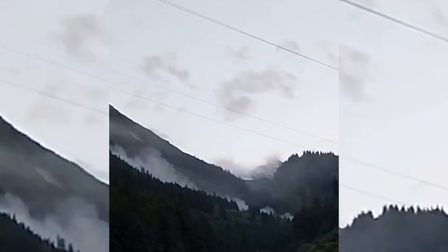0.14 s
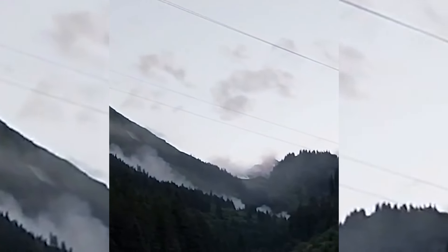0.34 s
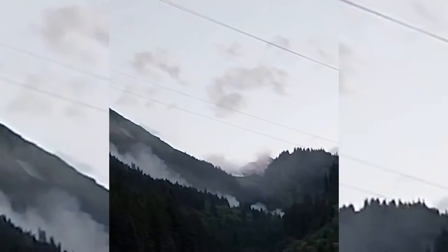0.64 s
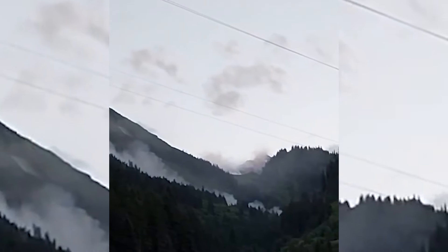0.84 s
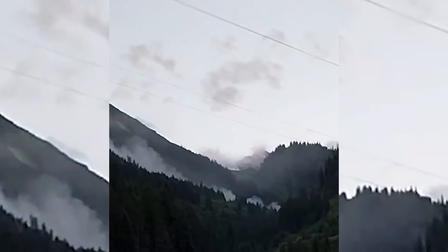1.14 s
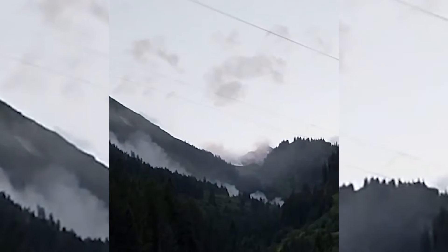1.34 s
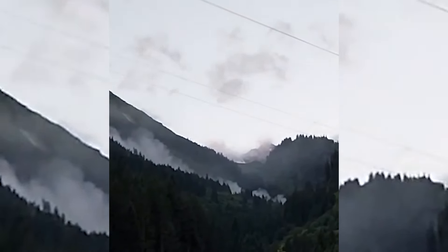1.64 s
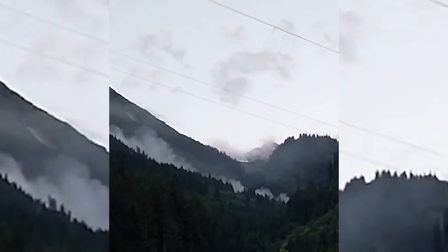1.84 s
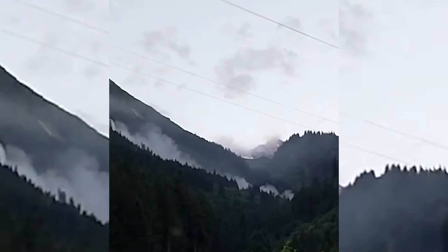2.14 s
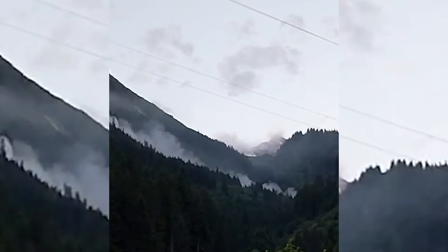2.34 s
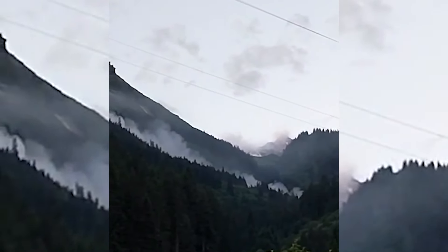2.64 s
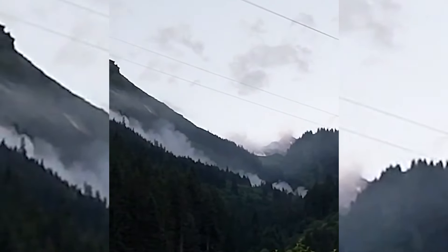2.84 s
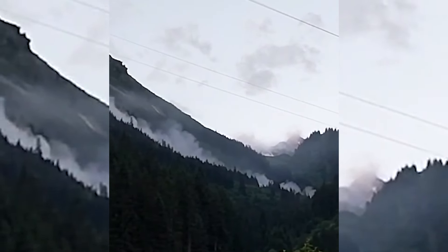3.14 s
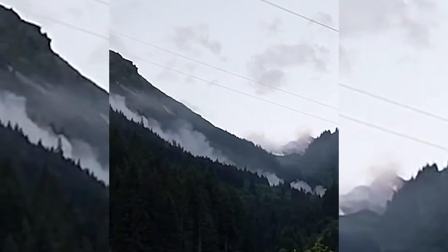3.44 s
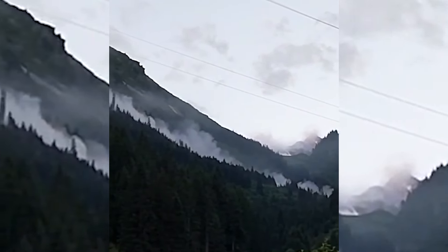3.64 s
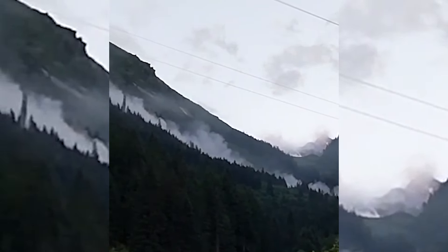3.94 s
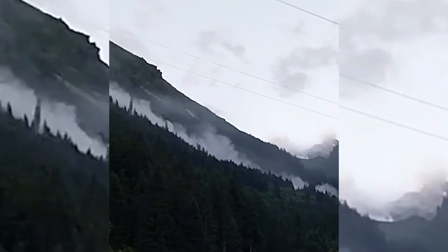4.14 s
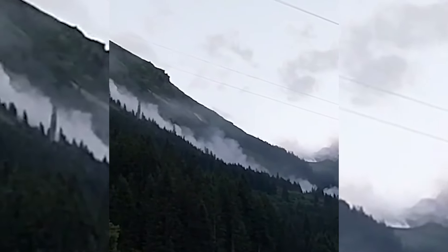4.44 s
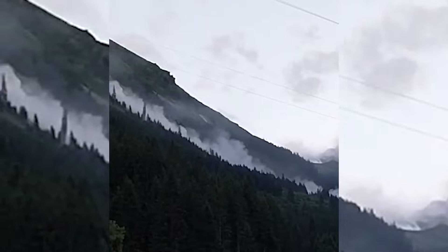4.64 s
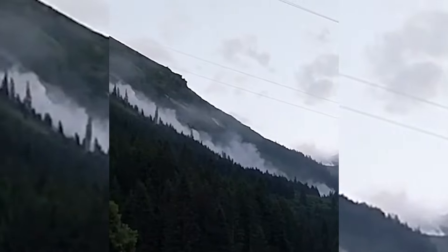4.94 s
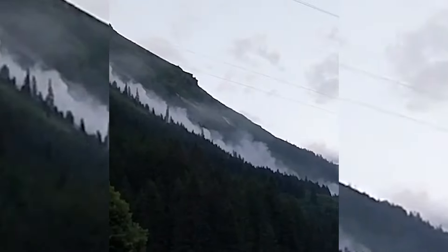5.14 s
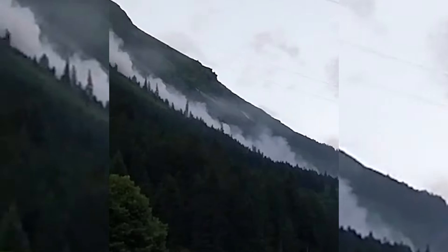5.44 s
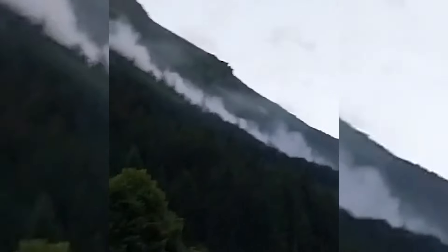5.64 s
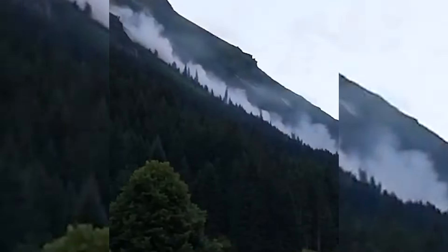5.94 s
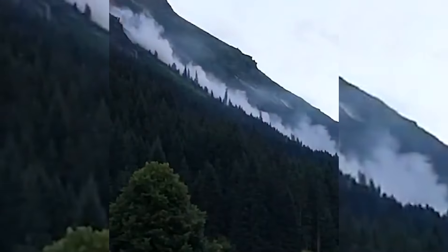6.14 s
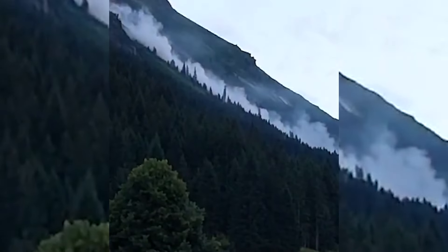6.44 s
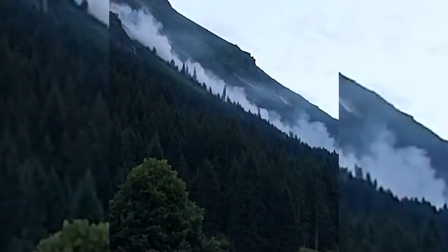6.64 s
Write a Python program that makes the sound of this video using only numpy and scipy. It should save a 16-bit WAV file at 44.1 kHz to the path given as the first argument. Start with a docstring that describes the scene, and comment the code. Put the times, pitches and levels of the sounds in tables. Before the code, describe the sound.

Rocks and debris slide down a distant mountain slope with a deep rumble and dull thuds, birds chirping faintly, hard cuts between loud and quieter stretches.

```python
"""A far mountain slope: rocks and debris slide down with a deep rumble and boulder thuds, under a thin forest hiss
and two chirping birds. Shaped noise makes the rumble, stones, gravel and hiss; short dying low tones make the thuds;
gliding tones with echoes make the birds. The sound is edited: a loud stretch and a quiet one, cut hard, play round
and round, and each cut clicks."""
import sys
import numpy as np
from scipy import signal
from scipy.fft import rfft, irfft
from scipy.io import wavfile
from scipy.ndimage import uniform_filter1d

SR = 44100
rng = np.random.default_rng(int(sys.argv[2]) if len(sys.argv) > 2 else 0)


def inscribe(sig):
    """Save sig as 16-bit PCM at rate SR to the path in sys.argv[1].

    A 1-D sig is mono; a 2-D sig holds one channel per row.
    Samples are clipped to [-1, 1] before scaling.
    """
    pcm = np.round(np.clip(np.atleast_2d(sig).T, -1, 1) * 32767)
    wavfile.write(sys.argv[1], SR, pcm.astype(np.int16))


N = 299439

LEAD_S = 0.00016  # the right port hears the slope and the high bird this much later [s]

# The loud and the quiet stretch; every event time below runs on this clock. The end values stand before the band limit:
# (start [s], end [s], first pressure (left, right) [full scale = 1], last pressure (left, right) [full scale = 1])
SPANS = [(.7266, 2.8266, (-.025, -.108), (-.1, -.113)), (2.8266, 4.3266, (-.006, -.012), (-.032, -.052))]
# Level of the stones and gravel (surge) and of the hiss, one list a stretch; the quiet stretch fades in:
# (time [s], surge [dB], hiss level [dB])
LEVELS = [
    [(.75, 1, -53), (1.15, -1.5, -52.5), (1.65, -.5, -52), (1.9, 1, -51), (2.15, 0, -52), (2.45, 2, -52),
     (2.8, .2, -51.5)],
    [(2.85, -15, -57), (3.05, -14, -57.5), (3.3, -10.5, -55), (3.65, -6.5, -52), (3.9, -6.5, -51.5),
     (4.3, -6, -52)],
]
# Tone colour of the deep roll; only its shape counts: (frequency [Hz], level per Hz [dB])
DEEP_ROLL = [(15, -55.5), (25, -38), (48, -11.5), (60, -8), (80, -15), (100, -7), (171, 1), (220, 0.5),
             (275, -11.5), (350, -19.5), (460, -28), (770, -120)]
# Unsteadiness of a chirp, a peep and a whistle, in that order: (loudness [dB], share of pitch [0-1])
UNSTEADY = (1.5, .008), (2.5, .012), (1.5, .008)


def rumble(k, t):
    """The slide rolls deeply: steadied low noise that swells and sinks."""
    # Level of the roll, one list a stretch: (time [s], level [dB])
    roll_level = [
        [(.75, -27.5), (1.17, -26.5), (1.5, -28), (1.56, -25.5), (1.63, -28), (1.77, -23), (1.83, -30),
         (1.97, -26), (2.17, -29.5), (2.62, -25), (2.8, -30)],
        [(2.85, -37.5), (3.36, -40), (3.43, -37.5), (3.74, -36.5), (3.82, -33), (3.89, -40.5), (4.0, -37.5),
         (4.25, -33.5), (4.3, -38)],
    ]
    colour = [(65, -60)] + [point for point in DEEP_ROLL if point[0] > 75]
    return noise(colour, t, np.transpose(roll_level[k]), patchy_db=1.3, size=2048, steady=0.71)


def shudder(k, t):
    """The lowest shudder: the bottom end of the roll as noise with a level curve of its own."""
    # Level of the shudder, one list a stretch: (time [s], level [dB])
    shudder_level = [
        [(.75, -40), (1.06, -49), (1.22, -37), (1.4, -46), (1.62, -38.5), (1.88, -40), (2.25, -43), (2.47, -35),
         (2.8, -45)],
        [(2.85, -52), (3.1, -48), (3.3, -46.5), (3.6, -41.5), (3.82, -52), (4.0, -41.5), (4.3, -43)],
    ]
    colour = [point for point in DEEP_ROLL if point[0] < 95] + [(110, -50), (200, -130)]
    return noise(colour, t, np.transpose(shudder_level[k]), patchy_db=.6, size=4096)


def thuds(t):
    """Each boulder gives a few low cycles that swell for some milliseconds and die."""
    # Boulders: (time [s], level before the swell [dB], pitch [Hz], time to die by 60 dB [s])
    boulders = [(0.836, -19.5, 173, 0.31), (0.94, -15, 186, 0.078), (1.099, -20, 185.4, 0.43),
                (1.396, -16, 164, 0.12), (1.869, -11, 154, 0.057), (1.971, -11, 168, 0.061),
                (2.079, -21.5, 164, 0.13), (2.232, -14.5, 192, 0.059), (2.41, -15, 146, 0.084),
                (2.592, -17, 178, 0.11), (2.685, -34, 164, 0.09), (2.757, -18.5, 225, 0.21),
                (3.26, -39, 169, 0.16), (3.377, -28, 199, 0.14), (3.433, -35.5, 171, 0.14),
                (3.559, -13.5, 199, 0.032), (3.806, -24, 226, 0.081), (3.919, -30.5, 259, 0.11),
                (3.966, -31, 248, 0.21)]
    out = np.zeros(len(t))
    u = np.arange(SR // 4) / SR
    for s, db, hz, t60 in boulders:
        if t[0] <= s < t[-1]:
            swell = 1 - np.exp(-u / 0.0016)
            ring = np.sin(2 * np.pi * hz * u) * amp(db - 60 * u / t60) * swell
            add(out, s - t[0], ring)
    return out


def clatter(k, t):
    """Smaller stones knock: mid-pitched noise that follows nearly all of the surge curve."""
    # Tone colour of the stones; only its shape counts: (frequency [Hz], level per Hz [dB])
    stones = [(180, -16), (300, -3.5), (387, -3.5), (448, -10.5), (498, -4), (545, -7.5), (640, -5.5),
              (780, -11), (950, -18.5), (1240, -53), (2090, -120)]
    s, surge_db, _ = np.transpose(LEVELS[k])
    level_db = -34.5 + 0.93 * surge_db
    return noise(stones, t, (s, level_db), patchy_db=1.1, size=1024, steady=.1)


def gravel(k, t):
    """Fine debris: higher noise that follows less than half of the surge curve."""
    # Tone colour of the fine debris; only its shape counts: (frequency [Hz], level per Hz [dB])
    fine_debris = [(530, -34.5), (900, -8), (984, -3), (1270, -5), (1680, -9), (2290, -17.5), (2600, -23),
                   (3380, -30.5), (5720, -120)]
    s, surge_db, _ = np.transpose(LEVELS[k])
    level_db = -44 + 0.44 * surge_db
    return noise(fine_debris, t, (s, level_db), patchy_db=1.37, size=1024)


def chirps():
    """The high bird's sharp chirps sweep up, hold and droop; each is a list of (s, Hz, dB)."""
    # Chirps: (start [s], sweep time [s], start pitch [Hz], top pitch [Hz], peak level [dB], echo strength [dB])
    sharp_notes = [(.784, .038, 4700, 5450, -35.5, -4), (2.392, .037, 4680, 5370, -41, 1),
                   (4.19, .023, 4950, 5510, -37.5, -3)]
    hold_s, droop_s, fade_s = .006, .012, .007
    droop_hz, droop_db = -340, -11.5
    faint_db, near_db, near = -24, -4, .72  # near: share of the sweep where the note is almost at full level
    calls = []
    for s, sweep_s, low_hz, top_hz, db, echo_db in sharp_notes:
        top = s + sweep_s
        held = top + hold_s
        drooped = held + droop_s
        rows = [(s, low_hz, db + faint_db),
                (s + near * sweep_s, low_hz + near * (top_hz - low_hz), db + near_db),
                (top, top_hz, db),
                (held, top_hz, db + near_db),
                (drooped, top_hz + droop_hz, db + droop_db),
                (drooped + fade_s, top_hz + droop_hz, db + faint_db)]
        calls.append((rows, UNSTEADY[0], echo_db))
    return calls


def peeps():
    """The high bird's soft peeps scoop up into the note and sag at the end."""
    # Peeps: (start [s], length [s], pitch [Hz], peak level [dB], place of the peak [share of length])
    soft_notes = [(2.885, .11, 5050, -56, .7), (3.348, .115, 5060, -51.5, .62),
                  (3.915, .145, 5090, -50.5, .55)]
    scoop_s, scoop_hz, sag_hz = .034, -400, -80
    early_db, end_db, echo_db = -5.5, -9, -4
    calls = []
    for s, length, hz, db, peak in soft_notes:
        rows = [(s, hz + scoop_hz, db + end_db),
                (s + scoop_s / 2, hz + scoop_hz / 4, db + early_db),
                (s + scoop_s, hz, db + early_db),
                (s + peak * length, hz, db),
                (s + length, hz + sag_hz, db + end_db)]
        calls.append((rows, UNSTEADY[1], echo_db))
    return calls


def whistles():
    """The low bird's flat note lifts a little; a break and a higher second note follow."""
    # Whistles: (start [s], first note [s], break [s], second note [s], second pitch [Hz],
    # first note's level [dB], second note's level [dB])
    two_notes = [(1.042, .075, .022, .052, 3680, -54.5, -53), (1.878, .068, .006, .088, 3600, -56, -55.5),
                 (2.778, .075, .02, .05, 3680, -54.5, -54.5), (3.552, .095, .006, .065, 3650, -56, -56)]
    flat_hz, lift_hz, slide_hz = 3465, 60, -40
    ends_db, break_db, echo_db = -3, -16, -5
    calls = []
    for s, first, pause, second, hz, db, next_db in two_notes:
        later = s + first + pause
        rows = [(s, flat_hz, db + ends_db),
                (s + .65 * first, flat_hz, db),
                (s + first, flat_hz + lift_hz, db + ends_db),
                (later - pause / 2, hz + 2 * slide_hz, db + break_db),
                (later, hz + slide_hz, next_db + ends_db),
                (later + .25 * second, hz, next_db),
                (later + second, hz + slide_hz, next_db + ends_db)]
        calls.append((rows, UNSTEADY[2], echo_db))
    return calls


def bird_note(rows, waver, flutter_db):
    """A near sine follows the rows (s, Hz, dB) while its pitch and loudness tremble a little."""
    s, hz, db = np.transpose(rows)
    t = np.arange(s[0], s[-1], 1 / SR)
    a, b = rng.standard_normal((len(t), 2)).T
    tremble = 1 + waver * evened(uniform_filter1d(a, size=120))
    # the root brings the smoothed noise back to a typical size of 1
    flutter = uniform_filter1d(uniform_filter1d(b, size=300), size=300) * np.sqrt(450)
    tone = np.sin(2 * np.pi * np.cumsum(np.interp(t, s, hz) * tremble) / SR)
    loudness = amp(np.interp(t, s, db) + flutter_db * flutter)
    return np.sqrt(2) * tone * loudness * signal.windows.tukey(len(t), .15)


def trunks(x, t60):
    """Echoes from the trees: sparse taps of random sign, other ones for each side."""
    u = np.arange(SR // 2) / SR
    signs = rng.choice([-1., 1.], (2, len(u)))
    hits = rng.random((2, len(u))) < 2000 / SR  # about 2000 echoes a second
    taps = signs * hits * amp(-60 * u / t60)
    taps = taps * np.minimum(u / .015, 1)  # the nearest trees answer late
    taps = taps / np.linalg.norm(taps, axis=1)[:, None]
    return signal.fftconvolve(x[None], taps, axes=1)[:, :len(x)]


def birds(t):
    """Both birds reach the ports directly, by clear hillside echoes and by scattered tree echoes."""
    # Clear echoes off the hillside: (delay [s], level [dB])
    hillside = [(.014, -10), (.03, -10), (.047, -12), (.064, -17)]
    # (calls, left minus right [dB], tree echo level [dB], delay of the right port [s])
    singers = ((chirps() + peeps(), -6, -6, LEAD_S), (whistles(), 3, -3, 0))
    out = 0
    for calls, pan_db, trees_db, lag_s in singers:
        song, thrown = np.zeros((2, len(t)))  # thrown: the part that goes out to be echoed
        for rows, (flutter_db, waver), echo_db in calls:
            start = rows[0][0]
            if t[0] <= start < t[-1]:
                call = bird_note(rows, waver, flutter_db)
                add(song, start - t[0], call)
                add(thrown, start - t[0], call * amp(echo_db))
        direct = np.array([song, np.roll(song, round(lag_s * SR))])
        tree_echoes = trunks(thrown, t60=.22)
        hill_echoes = sum(amp(db) * np.roll(thrown, round(s * SR)) for s, db in hillside)
        heard = direct + hill_echoes + amp(trees_db) * tree_echoes
        out = out + heard * amp([[pan_db / 2], [-pan_db / 2]])
    return out


def forest_hiss(k, t):
    """The forest hisses thinly: high noise with a slow level curve."""
    # Tone colour of the forest; only its shape counts: (frequency [Hz], level per Hz [dB])
    forest = [(2000, -40), (2500, -10), (3060, -8), (3400, -5), (3630, 0), (4300, -2), (4910, -5),
              (5650, -7.5), (6730, -11), (7400, -16), (7900, -29), (8600, -42), (12000, -58), (14000, -70)]
    s, _, hiss_db = np.transpose(LEVELS[k])
    return noise(forest, t, (s, hiss_db), patchy_db=1.54, size=512)


def top_fizz(k, t):
    """A faint fizz flickers at the very top: noise in short frames with strong patches."""
    # Tone colour of the fizz; only its shape counts: (frequency [Hz], level per Hz [dB])
    fizz = [(8200, -40), (9200, -9), (10000, -4), (10900, 0), (11500, -2), (11900, -25), (13000, -45)]
    # Level of the fizz, one list a stretch: (time [s], level [dB])
    fizz_level = [
        [(.75, -73.5), (.85, -77.5), (1.44, -77), (1.5, -70), (1.7, -73.5), (2.0, -67.5), (2.22, -72.5),
         (2.38, -77), (2.42, -66.5), (2.48, -79.5), (2.6, -71.5), (2.8, -78)],
        [(2.85, -83), (3.25, -83), (3.55, -77.5), (4.3, -78)],
    ]
    return noise(fizz, t, np.transpose(fizz_level[k]), patchy_db=2.5, size=256)


def noise(spectrum, t, rows, patchy_db, size, steady=0.):
    """Random short-time spectra with drifting patches, played along a level curve; steady irons out chance swells."""
    frames, hz = len(t) // (size // 4) + 5, np.fft.rfftfreq(size, 1 / SR)
    a, b, c, d, patches = rng.standard_normal((frames, len(hz), 5)).T
    patches = evened(uniform_filter1d(uniform_filter1d(patches, size=8, axis=0), size=8, axis=1))
    colour = amp(read(spectrum, hz)[:, None] + patchy_db * patches)
    z = np.array([a + 1j * b, c + 1j * d]) * colour  # two unrelated noises of one colour
    pair = signal.istft(z, nperseg=size, noverlap=3 * size // 4)[1][:, :len(t)]
    swell = uniform_filter1d(uniform_filter1d(pair ** 2, size=size // 2), size=size // 2)
    pair = pair / (abs(swell) + 1e-20) ** (np.clip(steady, 0, 1) / 2)
    return evened(pair) * amp(np.interp(t, *rows))


def ports(a, b):
    """Two microphone ports: the right hears a later, partly mixed with the unrelated b, and tilted."""
    # How alike the two sides are: (frequency [Hz], likeness [0-1])
    likeness = [(30, .98), (125, .993), (250, .965), (460, .84), (900, .55), (1800, .3), (3500, .22),
                (7000, .22)]
    # Balance of the sides: (frequency [Hz], left minus right [dB])
    balance = [(60, -2), (100, 0), (170, -0.5), (290, -1.5), (500, -1), (840, -7), (1430, -5.5),
               (2420, -0.5), (4100, -5.5), (6960, -2), (10000, -4.5)]
    hz = np.fft.rfftfreq(len(a), 1 / SR)
    same = np.clip(read(likeness, hz), 0, 1)
    tilt = amp(read(balance, hz) / 2)  # half goes to each side
    delayed = rfft(a) * np.exp(-2j * np.pi * hz * LEAD_S)
    right = same * delayed + np.sqrt(1 - same ** 2) * rfft(b)
    return irfft(np.array([rfft(a) * tilt, right / tilt]), len(a))


def amp(db):
    """Turn decibels into a plain factor."""
    return 10 ** (np.asarray(db) / 20)


def evened(x):
    """Scale a signal to an average (RMS) size of 1."""
    return x / np.sqrt(np.mean(x ** 2) + 1e-20)


def read(points, hz):
    """Read a curve between its points, on a logarithmic frequency axis."""
    f, value = np.transpose(points)
    return np.interp(np.log(hz + 1), np.log(f + 1), value)


def add(mix, s, sound):
    """Mix a sound in at s seconds, cut off at the end of the mix."""
    part = mix[round(s * SR):][:len(sound)]
    part += sound[:len(part)]


def stretch(k):
    """One uncut stretch of the slope; its two ends stand at the pressures where the cuts fell."""
    start, end, first, last = SPANS[k]
    t = start + np.arange(round((end - start) * SR)) / SR
    slope = shudder(k, t) + rumble(k, t) + clatter(k, t) + gravel(k, t)
    slope += forest_hiss(k, t) + top_fizz(k, t)
    slope += thuds(t)
    out = ports(*slope) + birds(t)
    # a quickly dying 170 Hz swing bends each end to its pressure
    settle = np.exp(-(t - start) / .004) * np.cos(2 * np.pi * 170 * (t - start))
    head = np.outer(first - out[:, 0], settle)
    tail = np.outer(last - out[:, -1], settle[::-1])
    return out + head + tail


def scene():
    """The stretches, butted together; the first is already under way."""
    # Which stretch follows which: (stretch number, 0 = loud, 1 = quiet)
    play_order = [0, 0, 1, 0, 0]
    parts = [stretch(0), stretch(1)]
    tape = np.hstack([parts[k] for k in play_order])
    # only the last bit of the first stretch is heard, as long as its start time on the clock
    skip = parts[0].shape[1] - round(SPANS[0][0] * SR)
    return tape[:, skip:skip + N]


def record(dry):
    """The band limit: a steep filter takes away what lies above about 15.7 kHz."""
    edge_hz = 15700
    lowpass = signal.firwin(511, edge_hz, window=("kaiser", 9), fs=SR)
    return signal.oaconvolve(dry, lowpass[None], "same")


dry = scene()
out = record(dry)
inscribe(out)
```